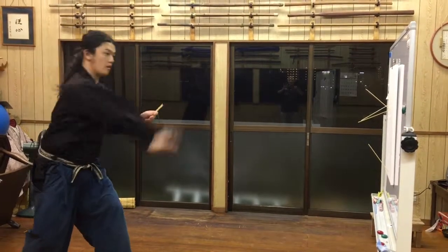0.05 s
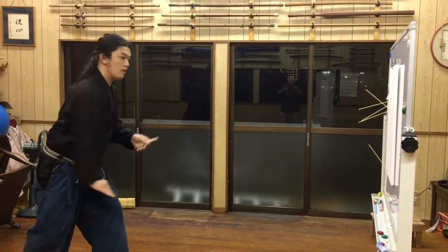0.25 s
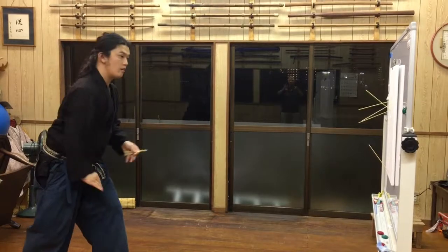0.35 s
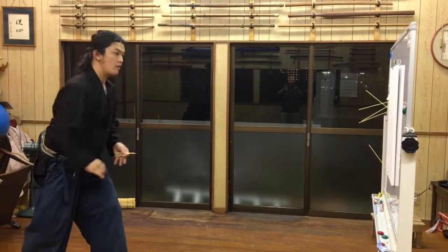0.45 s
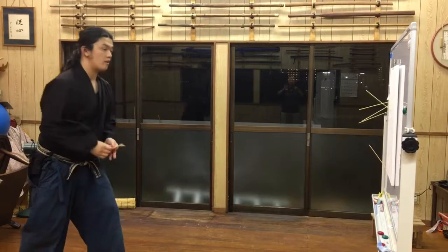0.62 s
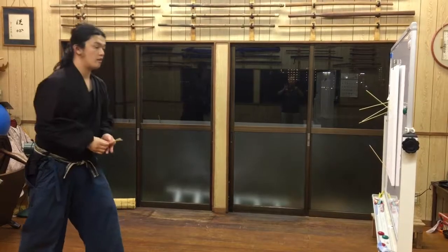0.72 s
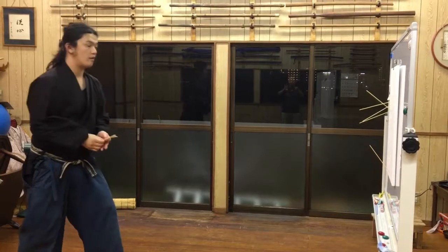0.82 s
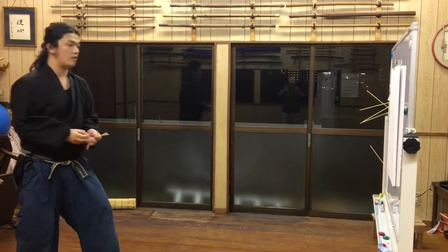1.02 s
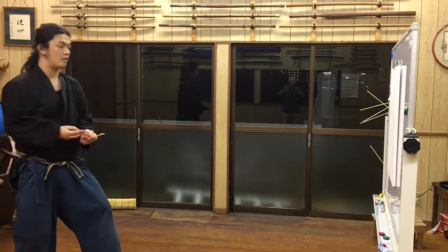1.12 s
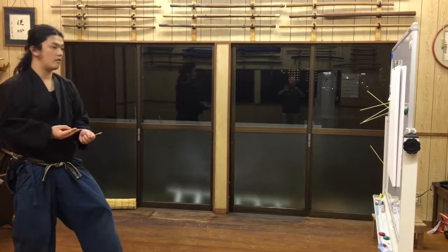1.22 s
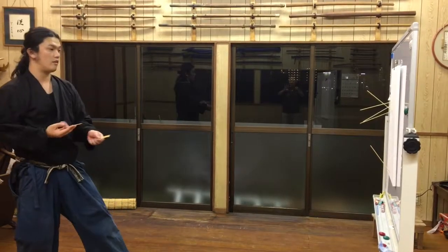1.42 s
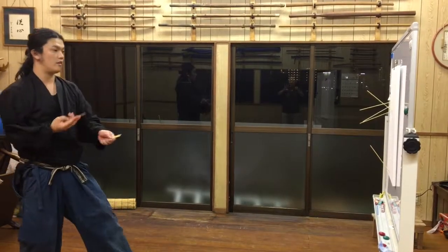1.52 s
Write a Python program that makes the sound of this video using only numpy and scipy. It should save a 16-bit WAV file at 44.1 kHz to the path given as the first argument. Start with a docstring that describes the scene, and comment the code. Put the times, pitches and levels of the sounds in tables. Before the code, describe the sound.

A bamboo skewer smacks into a standing board after a sleeve swish, in a wooden hall.

```python
"""A bare wooden hall on one microphone, low room rumble throughout. Close and dry, a sleeve swishes and
flaps with a throw. A quarter second in, a bamboo skewer hits a standing board tip first, slaps home
and rattles; the board booms and the hall rings on behind the hits. From half a second, close again,
the thrower shifts his feet softly on flexing floorboards, and near the end skewers tick in his hand."""
import sys
import numpy as np
from scipy import signal
from scipy.fft import rfft, irfft, next_fast_len
from scipy.io import wavfile

SR = 44100
rng = np.random.default_rng(int(sys.argv[2]) if len(sys.argv) > 2 else 0)


def wav_out(sig):
    """Save sig, one row per channel (or a flat mono array), as 16-bit PCM at SR to the path in sys.argv[1]."""
    wavfile.write(sys.argv[1], SR, np.round(np.clip(np.atleast_2d(sig).T, -1, 1) * 32767).astype(np.int16))


N = 68355
CRACK_RISE_S = 0.00014


def amp(db):
    """Decibels to gain."""
    return 10 ** (np.asarray(db) / 20)


def along(points, hz):
    """Read (frequency, value) points at hz, on a log frequency axis."""
    freqs, values = np.transpose(points)
    return np.interp(np.log(hz + 1), np.log(freqs + 1), values)


def since(s):
    """Seconds since s, zero before it."""
    return np.maximum(np.arange(N) / SR - s, 0)


def level(points):
    """Gain per sample from (time [s], level [dB]) points."""
    return amp(np.interp(since(0), *np.transpose(points)))


def filtered(x, response):
    """Filter x by a gain given as a function of frequency."""
    size = next_fast_len(N + SR // 2)
    return irfft(rfft(x, size) * response(np.fft.rfftfreq(size, 1 / SR)), size)[:N]


def noise(spectrum):
    """Coloured noise of rms 1; the spectrum sets only its shape."""
    x = filtered(rng.standard_normal(N), lambda hz: amp(along(spectrum, hz)))
    return x / np.sqrt(np.mean(x ** 2) + 1e-20)


def fall(t, t60):
    """Exponential decay, 60 dB in t60 seconds."""
    return 10 ** (-3 * t / t60)


def burst(s, rise, t60):
    """Envelope that rises at s and dies away; all in seconds."""
    t = since(s)
    return (1 - np.exp(-t / rise)) * fall(t, t60)


def ring(s, hz, rise, t60):
    """One struck mode: a decaying sine."""
    return np.sin(2 * np.pi * hz * since(s)) * burst(s, rise, t60)


def room_tone():
    """The room's steady rumble and faint hiss."""
    # air spectrum (frequency [Hz], level [dB])
    air_spectrum = [(15, -45), (28, -18), (45, -1), (68, 0.5), (105, -2), (140, -7.5), (200, -9),
                    (350, -17), (480, -20), (1400, -21.5), (2400, -28), (6000, -36.5), (16000, -44)]
    return amp(-59) * noise(air_spectrum)


def sleeve():
    """Close by, heavy cloth swishes with the swing and snaps taut a few times."""
    # the arm's swing through the air (time [s], level [dB])
    swing = [(0, -80), (.06, -61), (.105, -60.5), (.135, -52), (.17, -52), (.235, -55), (.3, -65),
             (.4, -100)]
    # swish spectrum (frequency [Hz], level [dB])
    swish_spectrum = [(60, -34), (200, 1.5), (350, 1.5), (500, -3), (1000, -4.5), (1500, -12.5),
                      (2100, -12), (2900, -29.5), (3600, -22), (7000, -30.5), (15000, -35.5)]
    # cloth snapping taut (time [s], level [dB])
    flaps = [(.111, -45.5), (0.1225, -45), (.144, -74)]
    # snap spectrum (frequency [Hz], level [dB])
    flap_spectrum = [(60, 4), (200, 8), (350, 5.5), (500, -16), (1000, 2.5), (1500, -2.5), (2100, -19),
                     (2900, -24), (7000, -27.5), (15000, -38)]
    snaps = sum(amp(db) * burst(s, rise=0.00035, t60=0.052) for s, db in flaps)
    return noise(swish_spectrum) * level(swing) + noise(flap_spectrum) * snaps


def skewer_tip():
    """The point bites first, and the shaft twangs as it stops."""
    # bite spectrum (frequency [Hz], level [dB])
    bite_spectrum = [(200, -15), (1000, 8), (3000, -17), (4000, -14), (6000, -1), (9500, 4), (14500, -4),
                     (16000, 2.5)]
    bite = amp(-30) * noise(bite_spectrum) * burst(0.2423, CRACK_RISE_S, t60=0.036)
    twang = amp(-32) * ring(0.2448, hz=3592, rise=CRACK_RISE_S, t60=0.091)
    return bite + twang


def skewer_rattle():
    """The skewer slaps home and rattles: each contact cracks, rings the board and sets off the hall."""
    # contacts (time [s], relative crack level [dB], relative clack level [dB], low-pass corner [Hz])
    contacts = [(.2452, -10.5, -8.5, 20000), (.2612, -3, -7.5, 3460), (.2982, -12, -26, 16100),
                (.3125, -6, -13.5, 5030), (.324, -14, -9.5, 4040)]
    # crack spectrum (frequency [Hz], level [dB])
    crack_spectrum = [(100, -35), (440, -15), (600, -2.5), (1080, -13), (1500, 5), (2650, 3), (3020, -0.5),
                      (3400, -3.5), (4600, 4.5), (5100, -1.5), (7500, 1), (9900, -9), (10400, -2.5),
                      (14500, -3), (16000, -24)]
    # the short clack of skewer on board (frequency [Hz], relative level [dB], t60 [s])
    clack_modes = [(572, -24, .08), (826, -2.5, 0.028), (1266, -16, 0.077), (1520, -14, .03),
                   (1682, -6, 0.031), (1805, -4, 0.016), (2125, -2.5, 0.037), (2264, -2, 0.032),
                   (2575, -1.5, 0.018), (3346, -11, 0.076), (3527, -4.5, 0.031), (4200, -9.5, 0.03),
                   (5410, -16, 0.017), (7800, -24, 0.027), (8320, -15, 0.072), (9640, 0.5, 0.015),
                   (12500, -20, 0.035), (15000, -15, 0.022)]
    out = np.zeros(N)
    for s, crack_db, clack_db, hardness_hz in contacts:
        crack = noise(crack_spectrum) * burst(s, CRACK_RISE_S, t60=0.018)
        clack = np.zeros(N)
        for mode_hz, db, t60 in clack_modes:
            # each contact lands elsewhere and shifts the modes a little
            gain = amp(db + rng.normal(0, 1))
            detune = 1 + 0.014 * rng.normal()
            clack += gain * ring(s, mode_hz * detune, rise=0.0011, t60=t60)
        hit = amp(crack_db) * crack + amp(clack_db) * clack
        hit = filtered(hit, lambda hz: 1 / (1 + 1j * hz / hardness_hz))
        out += hit + amp(3.5) * hall(hit)
    return amp(-18) * out


def hall(x):
    """The bare hall's answer: it builds up, then each frequency dies at its own speed."""
    # reverberation times (frequency [Hz], t60 [s])
    decay_times = [(100, 0.56), (350, 0.68), (800, 0.77), (2200, 0.83), (4300, 0.75), (6500, 0.63),
                   (10000, 0.44), (15000, 0.3)]
    hz, t, bands = signal.stft(rng.standard_normal(N), SR, nperseg=256)
    bands *= fall(t, along(decay_times, hz)[:, None])
    tail = signal.istft(bands, SR, nperseg=256)[1][:N]
    tail *= 1 - np.exp(-since(0.001) / 0.004)  # 1 ms delay, 4 ms rise
    return signal.fftconvolve(x, tail / np.linalg.norm(tail))[:N]


def board_boom():
    """The whole board swells a moment after the blow and rings on."""
    # the board's long modes (frequency [Hz], level [dB], t60 [s])
    boom_modes = [(162.6, -38, 0.65), (225.6, -36, 0.39), (261.5, -33, 0.34), (285.6, -33, 0.33),
                  (331.4, -45, 0.42), (794.4, -42, 0.62), (849.4, -38.5, 0.35), (1596, -37, 0.51),
                  (1645, -40, 0.52), (2123, -39, 0.58), (2250, -45, 0.35), (2337, -41.5, 0.44),
                  (3302, -57, 0.3)]
    return sum(amp(db) * ring(0.248, hz, rise=0.012, t60=t60) for hz, db, t60 in boom_modes)


def feet():
    """Close by, the trousers brush, the floorboards flex, and soft soles scuff and thud."""
    # trouser cloth brushing (time [s], level [dB])
    brushing = [(0, -73), (.75, -75), (.83, -72.5), (.95, -98), (1.19, -82), (1.23, -66.5), (1.3, -61),
                (1.44, -70.5), (1.55, -80)]
    # floorboards flexing under the weight (time [s], frequency [Hz], level [dB], t60 [s])
    flexes = [(.525, 66, -49.5, 0.31), (.63, 72.5, -51.5, 0.42), (1.27, 102, -34, 0.12),
              (1.314, 105.9, -37.5, 0.23), (1.529, 50, -41, 0.84)]
    # footfalls (time [s], thud level [dB], scuff level [dB], thud rise [s])
    footfalls = [(0.751, -59.5, -70, 0.0052), (1.249, -45.5, -51.5, 0.0064), (1.39, -57, -69, 0.045)]
    # spectrum of rubbing soles and cloth (frequency [Hz], level [dB])
    scuff_spectrum = [(100, -5), (600, 0), (1100, -9), (2400, -1.5), (3400, -6), (4400, -7), (7000, -11),
                      (10000, -17), (14000, -24.5), (16000, -31)]
    # thud spectrum (frequency [Hz], level [dB])
    thud_spectrum = [(30, -31), (60, 3.5), (105, -22), (145, -4), (200, 2), (300, -6), (450, -19.5),
                     (800, -21), (2000, -66), (8000, -77)]
    scuff_lead_s = 0.0063
    out = noise(scuff_spectrum) * level(brushing)
    out += sum(amp(db) * ring(s, hz, rise=0.0056, t60=t60) for s, hz, db, t60 in flexes)
    for s, thud_db, scuff_db, rise in footfalls:
        out += amp(thud_db) * noise(thud_spectrum) * burst(s, rise, t60=0.34)
        out += amp(scuff_db) * noise(scuff_spectrum) * burst(s - scuff_lead_s, rise=0.023, t60=0.41)
    return out


def skewers_in_hand():
    """Faint ticks as the next skewer is drawn from the bunch."""
    # skewers ticking together (time [s], level [dB])
    tick_times = [(1.2427, -50), (1.251, -52.5), (1.26, -51), (1.2783, -53)]
    # tick spectrum (frequency [Hz], level [dB])
    tick_spectrum = [(300, -25), (1500, 10), (2400, -8), (4400, 9), (8000, 2), (14000, -6), (16000, -10)]
    envelope = sum(amp(db) * burst(s, rise=0.0002, t60=0.0097) for s, db in tick_times)
    return noise(tick_spectrum) * envelope


def scene():
    """Throw, hit and steps over the room's rumble, in mono."""
    throw = sleeve() + skewer_rattle() + skewer_tip() + board_boom()
    return (throw + feet() + skewers_in_hand() + room_tone())[None]


def record(dry):
    """The microphone's channel cuts off steeply above its band limit."""
    top_hz = 15800
    return filtered(dry[0], lambda hz: 1 / np.sqrt(1 + (hz / top_hz) ** 300))[None]


dry = scene()
out = record(dry)
wav_out(out)
```